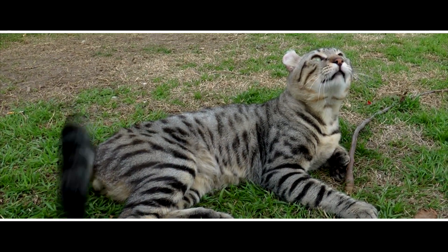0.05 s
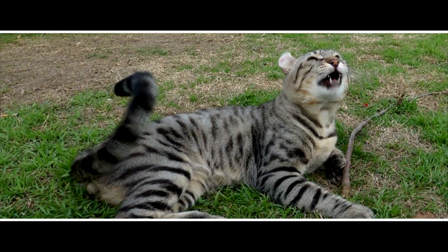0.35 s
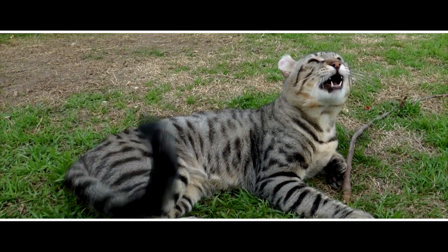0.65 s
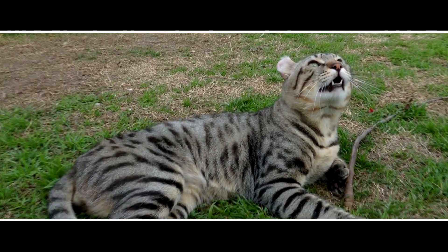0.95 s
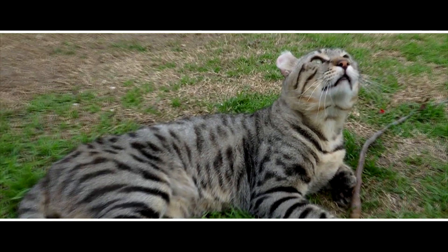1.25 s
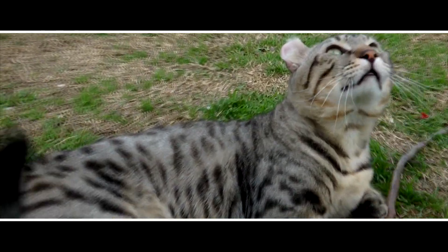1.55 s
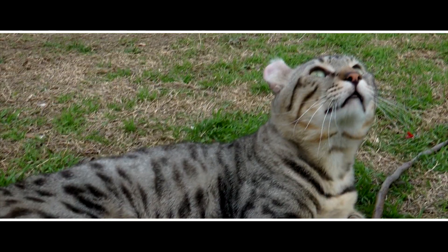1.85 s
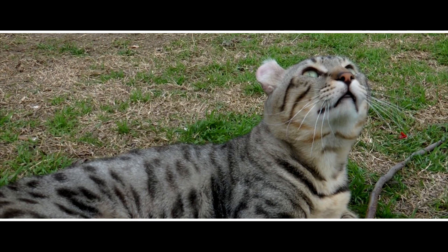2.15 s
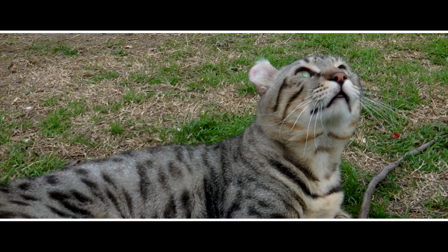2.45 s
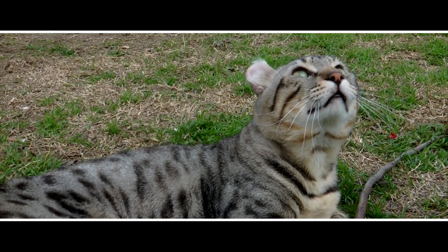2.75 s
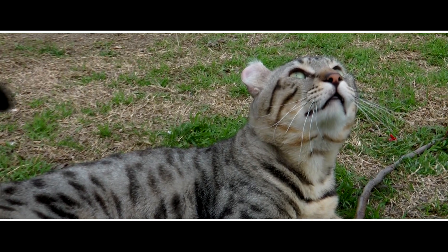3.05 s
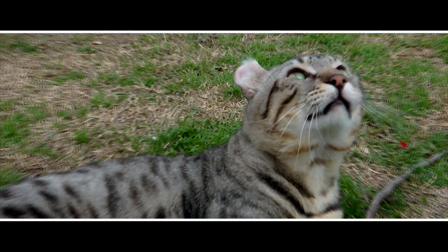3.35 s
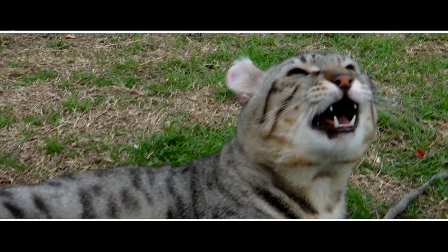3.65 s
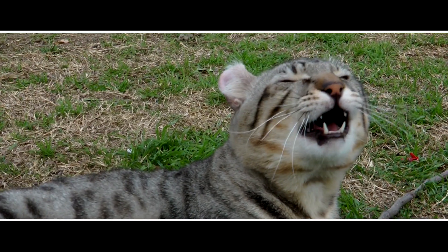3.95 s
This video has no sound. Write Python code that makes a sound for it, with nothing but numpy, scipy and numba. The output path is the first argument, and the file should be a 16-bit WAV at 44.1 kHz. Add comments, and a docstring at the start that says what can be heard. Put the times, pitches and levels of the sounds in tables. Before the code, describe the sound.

Harsh, stuttering calls from a large cat close by, with a distant engine drone.

```python
"""Outdoor rumble and a distant engine drone come first; then, up close, a large cat lying on grass parts its
lips with a tick and chatters: harsh syllables, about 17 a second, ending in a thin rising mew. A soft hiss
passes, the cat sniffs, and it chatters again. Uneven vocal-fold pulses ring the throat and leave through the
moving mouth: in each syllable the pitch arches and the tone brightens; between syllables the voice breaks up
and air hisses through the teeth."""
import sys
import numpy as np
from scipy import signal
from scipy.fft import rfft, irfft
from scipy.io import wavfile
from scipy.ndimage import uniform_filter1d
from numba import njit

SR = 44100
rng = np.random.default_rng(int(sys.argv[2]) if len(sys.argv) > 2 else 0)


def store_wav(level_fs):
    """Save 16-bit WAV to argv[1]."""
    pcm = np.round(np.clip(np.atleast_2d(level_fs), -1, 1) * 32767)
    wavfile.write(sys.argv[1], SR, pcm.T.astype(np.int16))


N = 176400

# Colour of the outdoor rumble. Each row: frequency in Hz, relative level in dB.
RUMBLE_COLOUR = [(15, -45), (25, -21), (75, -8.5), (112, -2), (146, -6.5), (243, -10.5), (404, -23.5),
                 (438, -20.5), (475, -24.5), (769, -22.5), (833, -24.5), (1060, -20.5), (2500, -34),
                 (4620, -43.5), (7280, -51.5), (15000, -58.5)]
# Where the rumble leans. Each row: frequency in Hz, left minus right in dB.
RUMBLE_BALANCE = [(60, -1), (110, -2.5), (200, -4), (380, -6.5), (690, -11), (1280, -13), (4360, -13),
                  (8050, -9.5), (14800, -12)]
# How alike its sides are. Each row: frequency in Hz, correlation (1 is mono).
RUMBLE_LIKENESS = [(60, 0.68), (130, 0.65), (290, 0.13), (640, 0.035), (1400, 0.49), (4000, 0.19),
                   (14000, .15)]
# Fader ride on the wash above the bass. Each row: time in seconds, gain in dB.
WASH_RIDE = [(0, 1), (1.1, 1.5), (1.7, 2.5), (2.1, 1), (2.6, 3), (3.2, 2.5), (4, 6)]
# The distant engine. Each row: time in seconds, firing rate in Hz, level in dB.
ENGINE_PATH = [(0, 126, -40), (.6, 133, -38), (1.15, 127, -37), (1.7, 119, -38.5), (2.3, 119, -37),
               (3, 119, -38), (4, 122, -41)]
# A lower hum that swells at the end. Each row: time in seconds, level in dB.
HUM_SWELL = [(0, -70), (3.4, -45.5), (3.7, -35), (4, -35.5)]
# Steady tones far off. Each row: pitch in Hz, level in dB, waver as a share of the pitch.
FAR_TONES = [(105.7, -48, 0.019), (783, -55.5, 0.00316)]
# Soft hisses: a longer one, then the cat's faint sniffs. Each row: centre in seconds, half length in seconds,
# level in dB.
HISS_SWELLS = [(1.697, 0.21, -55), (2.2, 0.019, -55), (3.352, 0.015, -48), (3.378, 0.0092, -44.5)]
# Colour of the soft hisses. Each row: frequency in Hz, relative level in dB.
HISS_COLOUR = [(1000, -8), (3000, -9), (5000, 4), (7000, 1.5), (10000, -6), (14500, -13.5)]
# Colour of the throat. Each row: frequency in Hz, gain in dB.
THROAT_COLOUR = [(120, -48), (250, -7.5), (335, -8.5), (420, -10), (520, -15), (675, -4.5), (780, -11),
                 (900, -18.5), (1080, -12.5), (1350, -7.5), (1750, -2), (2100, -7), (2350, -8),
                 (2750, -7.5), (3300, -10), (4500, -18), (8000, -59)]
# High resonances that bypass the mouth filter. Each row: centre in Hz, width in Hz, gain in dB.
HIGH_RINGS = [(3560, 170, -15), (4900, 850, -16), (5480, 580, -22), (6700, 300, -40)]
# Air between the teeth. Each row: frequency in Hz, relative level in dB.
TEETH_COLOUR = [(300, -11), (1500, 7), (3800, -2), (5200, 5), (6300, -4.5), (7400, -5.5), (8500, -23),
                (11000, -21.5), (15000, -27)]
# The closing mew. Each row: time in seconds, pitch in Hz, relative level in dB, mouth cutoff in Hz.
MEW_PATH = [(0.798, 499, -40, 1904), (.815, 512, -30.5, 1840), (0.837, 535.5, -27, 1900),
            (0.848, 561.5, -37, 2580), (0.873, 597, -42, 2500), (.9, 590, -46.5, 2500),
            (.92, 550, -75, 2360)]
# The syllables of both calls. Each row: start in seconds, length in seconds, relative level in dB,
# pitch in Hz at start, crest and end, roughness from 0 to 1, mouth opening from 0 to 1.
CHATTER_SYLLABLES = [ (0.212, 0.028, -23, 344.6, 337.3, 295, 0.8, .3),
                     (0.248, 0.04, -21.5, 321.3, 336.8, 294.3, 0.43, 0.53),
                     (.307, 0.042, -22.5, 344.7, 328.2, 299.3, 0.65, 0.65),
                     (0.367, 0.043, -23.5, 346.5, 358, 333.3, 0.48, 0.73),
                     (0.426, .047, -22.5, 372.6, 358.7, 308.1, 0.61, 0.74),
                     (.494, 0.039, -21.5, 349.6, 340, 311.5, 0.31, 0.55),
                     (0.543, 0.06, -26, 373, 388.2, 392.5, 0.24, 0.85),
                     (0.607, .027, -22, 458.5, 445, 421, 0, 0.33),
                     (0.64, .021, -25.5, 378.3, 387, 369, 0, 0.84),
                     (0.665, .032, -23, 384.6, 424.9, 398.2, 0.1, 0.3),
                     (0.699, .022, -26, 371.4, 379.4, 358.2, 0.25, .9),
                     (0.742, .047, -22.5, 461.7, 440.4, 418.8, 0.11, 0.29),
                     (3.494, .040, -21.5, 440, 345.7, 290.9, 0.25, .25),
                     (3.543, 0.042, -21, 321, 324.9, 296.7, 0.35, 0.63),
                     (3.595, .041, -17.5, 332.2, 344, 313.4, 0.38, 0.82),
                     (3.648, 0.039, -16, 344.4, 331.1, 314.2, .35, 0.85),
                     (3.707, 0.044, -16.5, 340.3, 335.3, 302.9, 0.36, 0.82),
                     (3.759, 0.048, -19, 338, 364.7, 321.3, .25, 0.95),
                     (3.816, .050, -20, 363, 359.9, 323.3, 0.37, 0.96),
                     (3.867, .055, -19, 375.9, 379, 310.8, 0.31, 0.94),
                     (3.934, 0.029, -20, 373, 380, 365.4, 0.14, 0.81),
                     (3.968, 0.023, -22, 342, 344.5, 328.2, 0.21, 0.54)]
# Where the cat sits in the stereo image. Each row: frequency in Hz, left minus right in dB.
CAT_PAN = [(60, -8), (110, -8), (200, -0.5), (380, -13.5), (690, -7), (1280, -2), (2370, -3.5), (4360, -9),
           (8050, -6.5), (14800, -32)]
# Its phase between the sides. Each row: frequency in Hz, lead of the left in radians.
CAT_LEFT_LEAD = [(260, -.9), (600, 0.96), (1640, -0.054), (2240, -.4), (2500, -0.74), (6000, 1)]


def undb(db):
    """Decibels to gain."""
    return 10 ** (np.asarray(db) / 20)


def unit(x):
    """Scale to rms 1."""
    return x / np.sqrt(np.mean(x ** 2))


def times():
    """Time of each sample in seconds."""
    return np.arange(N) / SR


def per_bin(points):
    """Spread a (Hz, value) curve over the frequency bins."""
    hz, value = np.array(points, float).T
    return np.interp(np.log(np.arange(N // 2 + 1) * SR / N + 1e-3), np.log(np.maximum(hz, 1)), value)


def noise(colour):
    """Noise of a given (Hz, dB) colour, rms 1."""
    return unit(irfft(rfft(rng.standard_normal(N)) * undb(per_bin(colour)), N))


def wander(per_second):
    """A smooth random modulator, rms 1."""
    hold = int(SR / per_second)
    steps = np.repeat(rng.standard_normal(N // hold + 1), hold)
    return unit(uniform_filter1d(uniform_filter1d(steps, hold), hold)[:N])


def pan(db):
    """Left and right gains for a level difference, averaging 1."""
    gains = undb(np.array([np.atleast_1d(db), -np.atleast_1d(db)]) / 2)
    return gains / gains.mean(axis=0)


def resonate(x, hz, width_hz):
    """Two passes through one resonance, gain 1 at its centre."""
    peak = signal.iirpeak(hz, hz / width_hz, fs=SR)
    return signal.lfilter(*peak, signal.lfilter(*peak, x + 1e-18))


@njit
def lowpass(x, hz, damping):
    """Resonant low-pass with a sweepable cutoff."""
    out, band, low = np.empty(len(x)), 0., 0.
    for i in range(len(x)):
        g = np.tan(np.pi * hz[i] / SR)
        v = (band + g * (x[i] + 1e-18 - low)) / (1 + g * (g + damping))
        out[i] = low + g * v
        band, low = 2 * v - band, low + 2 * g * v
    return out


def outdoors(level_db=-34.5):
    """The bed: rumble much alike on both sides, under a wider, gently wavering wash."""
    likeness = per_bin(RUMBLE_LIKENESS)
    mid, side = rfft(noise(RUMBLE_COLOUR)), rfft(noise(RUMBLE_COLOUR))
    pair = mid + side * np.sqrt((1 - likeness) / (1 + likeness)) * np.array([[1], [-1]])
    pair = pair * np.sqrt((1 + likeness) / 2) * pan(per_bin(RUMBLE_BALANCE))
    wash_share = per_bin([(250, 0), (600, 0.72)])
    ride_db = np.interp(times(), *np.array(WASH_RIDE).T) + 0.38 * wander(9.42)
    wash = irfft(pair * wash_share, N) * undb(ride_db)
    rumble = irfft(pair * (1 - wash_share), N) * undb(0.48 * wander(12))
    return undb(level_db) * (rumble + wash)


def engine_drone(hum_hz=85, waver=0.01957, flutter_db=3):
    """A distant engine wavers and beats against a lower hum and other steady tones."""
    t = times()
    when, firing_hz, db = np.array(ENGINE_PATH).T
    engine = (np.interp(t, when, firing_hz), np.interp(t, when, db), waver)
    hum = (hum_hz, np.interp(t, *np.array(HUM_SWELL).T), waver)
    out = 0
    for hz, level_db, depth in [engine, hum, *FAR_TONES]:
        phase = 2 * np.pi * np.cumsum(hz * (1 + depth * wander(20))) / SR
        flutter = unit(undb(flutter_db * wander(24.93)))
        out = out + np.sqrt(2) * np.sin(phase) * undb(level_db) * flutter
    return out * pan(db=-4)


def soft_hisses():
    """Brief, soft swells of high hiss, off to the right: a longer one, then the cat's sniffs."""
    t = times()
    swell = sum(undb(db) * np.exp(-((t - centre) / half) ** 2) for centre, half, db in HISS_SWELLS)
    return np.array([noise(HISS_COLOUR), noise(HISS_COLOUR)]) * swell * pan(db=-12)


def lip_click(start_s=.168, decay_s=0.0043, gain_db=-19.5):
    """A tiny wet tick as the lips part before the first call."""
    age = times() - start_s
    tick = rng.standard_normal(N) * (age > 0) * np.exp(-np.abs(age) / decay_s)
    return undb(gain_db) * resonate(tick, hz=2600, width_hz=790)


@njit
def vocal_folds(hz, jitter, shimmer_db, chance):
    """One pulse per cycle of the folds, each with its own length and size; also the phase in cycles."""
    pulses, phases = np.zeros(len(hz) + 1), np.zeros(len(hz))
    phase, cycle = 0., 0
    for i in range(len(hz)):
        step = hz[i] * (1 + jitter[i] * chance[cycle, 0]) / SR
        phase += step
        if phase >= 1:
            phase, cycle = phase - 1, cycle + 1
            size = 10 ** (shimmer_db[i] * chance[cycle, 1] / 20) / np.sqrt(hz[i] / SR)
            pulses[i] += size * phase / step  # the pulse falls between two samples
            pulses[i + 1] += size * (1 - phase / step)
        phases[i] = phase
    return pulses[:-1], phases


def throat(source):
    """The throat colours each pulse, ringing only after it is struck (minimum phase)."""
    cepstrum = irfft(np.log(undb(per_bin(THROAT_COLOUR))), N)
    cepstrum[1:N // 2] *= 2
    cepstrum[N // 2 + 1:] = 0
    response = irfft(np.exp(rfft(cepstrum)), N)[:SR // 20]
    return signal.fftconvolve(source, response)[:N]


def voice(hz, effort, rough, cutoff_hz, ring):
    """Uneven pulses and a puff of air per cycle ring the throat and leave through the moving mouth."""
    chance = rng.uniform(-1.5, 1.5, (N // 20, 2))
    pulses, phase = vocal_folds(hz, jitter=.08 * rough, shimmer_db=4 * rough, chance=chance)
    puffs = unit(np.exp(-phase / .6) * rng.standard_normal(N))
    source = (pulses + 1.09 * rough * puffs) * effort
    cavity = lowpass(throat(source), 0.95 * cutoff_hz, damping=0.41)  # sharp peak just under the cutoff
    mouth = lowpass(lowpass(cavity, cutoff_hz, damping=1.13), cutoff_hz, damping=1.13)
    sheen = sum(undb(db) * resonate(source, centre, width) for centre, width, db in HIGH_RINGS)
    return mouth + ring * sheen


def mew(gain_db=13.5):
    """A thin, clean, rising note that ends the first call."""
    t = times()
    when, hz, db, cutoff_hz = np.array(MEW_PATH).T
    effort = undb(np.interp(t, when, db, left=-200, right=-200) + gain_db)
    rough = np.full(N, 0.15)
    return voice(np.interp(t, when, hz), effort, rough, np.interp(t, when, cutoff_hz), ring=0.44)


def chatter(voice_db=10.5):
    """Each syllable starts hard, arches in pitch and mouth opening, then fades to a rattle and hiss."""
    attack_s, release_s, rattle_db = 0.0036, 0.0061, -16
    kick_db, kick_s = 5, 0.0032  # the first pulses hit hardest
    hiss_db, gasp_db, gasp_lead_s, gasp_width_s = -38, -33, 0.0065, 0.0096
    shut_hz, opening_hz, lip_drop_hz = 1816, 1070, 480  # the mouth brightens as it opens
    t = times()
    effort, voiced, mouth, lips, rough, hiss = np.zeros((6, N))
    pitch_points = []
    for start, length, db, start_hz, crest_hz, end_hz, roughness, opening in CHATTER_SYLLABLES:
        age = t - start
        attack = np.clip(age / attack_s + 1, 0, 1)
        gate = attack * np.exp(-np.maximum(age - length + release_s, 0) / release_s)
        rattle = np.interp(age, [length - release_s, length, length + 0.014, length + 0.017], [0, 1, 1, 0])
        mid_call = pitch_points and start - pitch_points[-1][0] < .1
        if mid_call:
            kick = undb(kick_db * np.exp(-np.maximum(age, 0) / kick_s))
            gasp = undb(gasp_db) * np.exp(-((age + gasp_lead_s) / gasp_width_s) ** 2 / 2)
        else:  # a call starts with the lips nearly closed
            kick, gasp = 1, 0
            lips += np.exp(-(age / .024) ** 2)
        effort += undb(db) * (gate * kick + undb(rattle_db) * rattle)
        progress = np.clip(age / length, 0, 1) ** 0.87  # the mouth opens faster than it shuts
        mouth += opening * np.abs(np.sin(np.pi * progress)) ** 0.9
        voiced += gate
        rough += gate * roughness
        hiss += (undb(hiss_db) * gate + gasp) * (roughness + 0.31)
        pitch_points += [(start, start_hz), (start + .42 * length, crest_hz), (start + length, end_hz)]
    hz = uniform_filter1d(np.interp(t, *np.array(pitch_points).T), size=300)
    rough += 0.78 * np.clip(1 - voiced, 0, 1)  # the voice breaks up in the gaps
    cutoff_hz = shut_hz + opening_hz * mouth - lip_drop_hz * lips
    parted = 1 - lips
    air = hiss * parted * noise(TEETH_COLOUR)
    crackle = unit(undb(2.5 * wander(900)))  # saliva makes the hiss crackle
    return undb(voice_db) * voice(hz, effort, rough * parted, cutoff_hz, ring=parted) + air * crackle


def cat(yard_db=-9, yard_t60_s=0.19):
    """The cat arrives close and right of centre, with a faint scatter from the yard behind it."""
    t = times()
    calls = rfft(chatter() + mew() + lip_click())
    placement = pan(per_bin(CAT_PAN)) * np.exp(.5j * np.array([[1], [-1]]) * per_bin(CAT_LEFT_LEAD))
    direct = irfft(calls * placement, N) * np.clip(t / .1, 0, 1)
    decay = np.exp(-np.log(1000) * t / yard_t60_s) * (t > .004)
    tail = (rng.standard_normal((2, N)) * decay)[:, :SR // 2]
    tail /= np.sqrt(np.sum(tail ** 2, axis=1, keepdims=True))
    return direct + undb(yard_db) * signal.fftconvolve(direct, tail, axes=1)[:, :N]


def scene():
    """The cat up front, over the outdoor bed."""
    return cat() + outdoors() + engine_drone() + soft_hisses()


def record(dry):
    """A steep high cut takes the very top off the mix."""
    top_hz = 15300
    return signal.sosfilt(signal.ellip(10, .2, 80, top_hz, fs=SR, output="sos"), dry)


dry = scene()
out = record(dry)
store_wav(out)
```